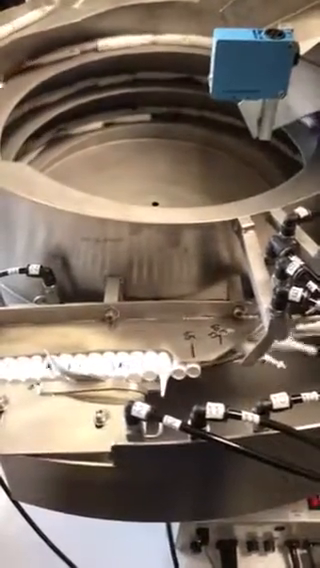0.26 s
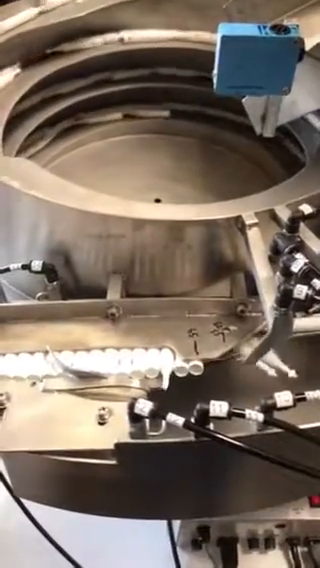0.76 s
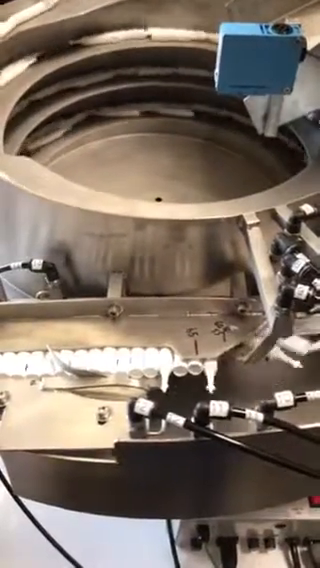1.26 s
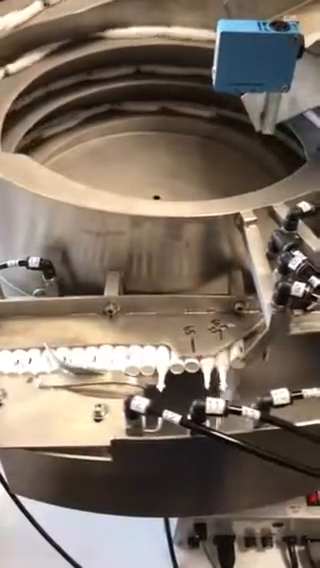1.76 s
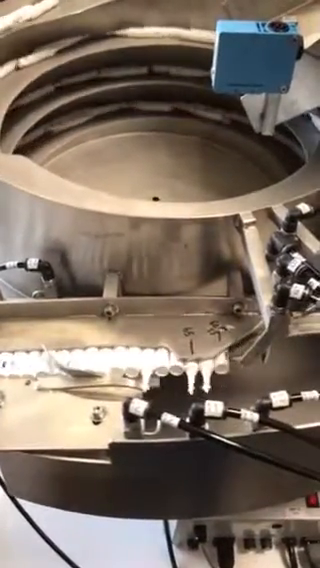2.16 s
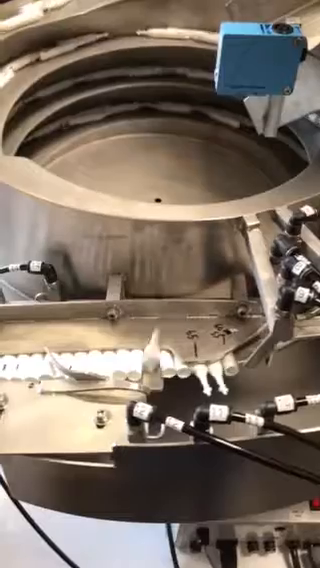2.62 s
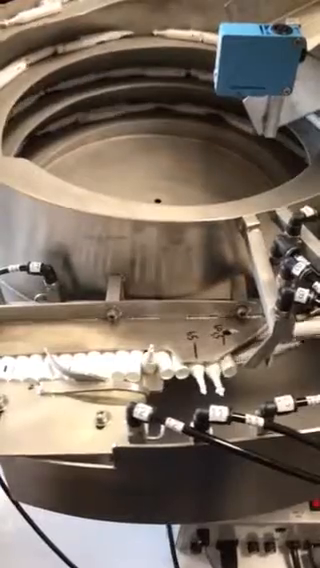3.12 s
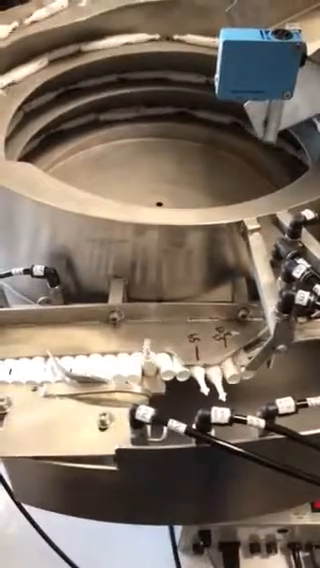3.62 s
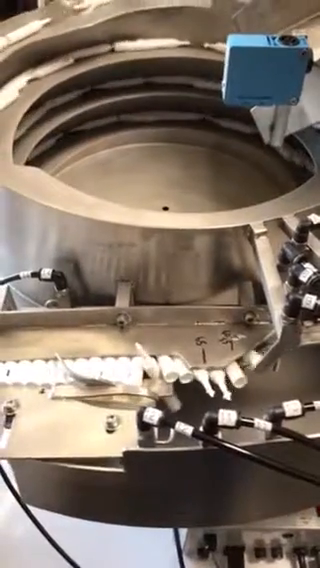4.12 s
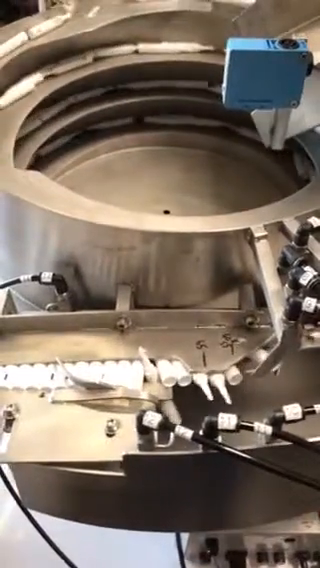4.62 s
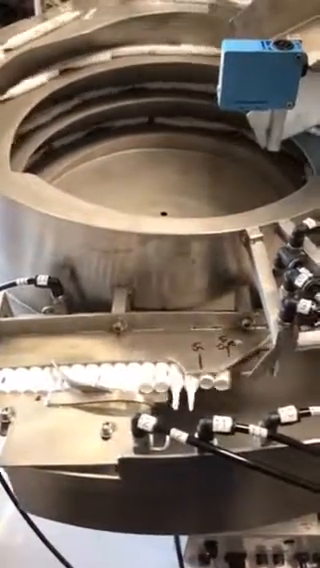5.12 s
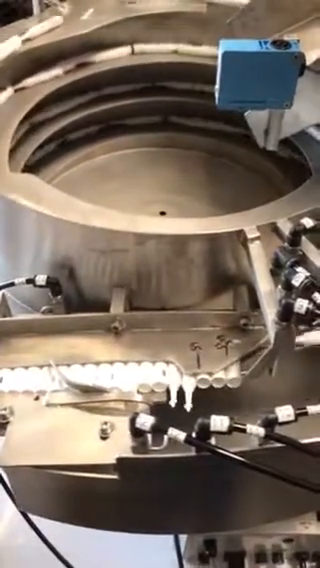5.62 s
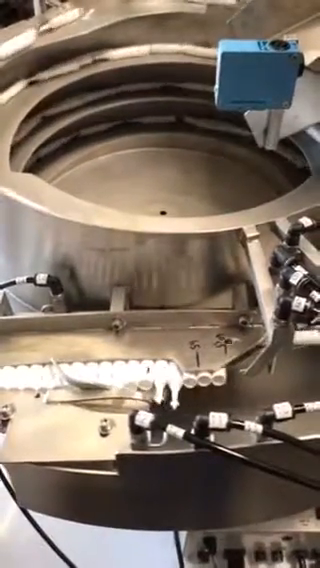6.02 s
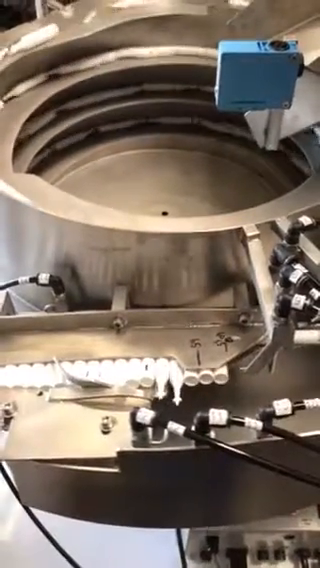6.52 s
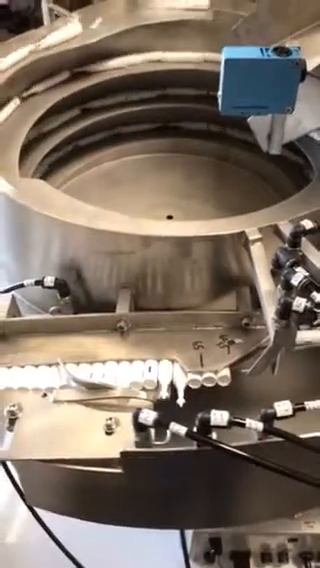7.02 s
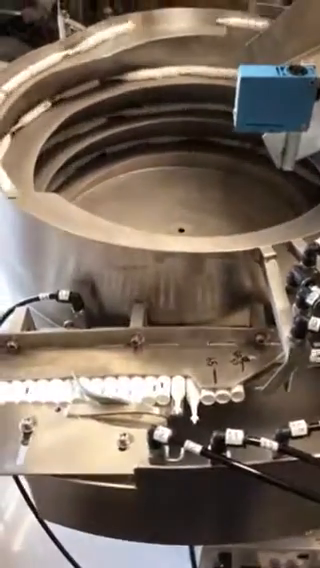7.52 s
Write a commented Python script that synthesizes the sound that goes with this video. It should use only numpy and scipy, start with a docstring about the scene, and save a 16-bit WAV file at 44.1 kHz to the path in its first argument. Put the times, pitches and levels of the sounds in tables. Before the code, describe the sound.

A vibratory bowl feeder hums deeply under a constant chatter of small tubes, with air jets hissing and spitting.

```python
"""A deep hum under bright chatter and hiss: a vibratory bowl feeder running in a workshop.
Its mains-driven magnet shakes the steel bowl, and small tubes chatter along the track on every stroke.
Air jets hiss at the sorting gate, sound the tubes' hollow resonances as they pass,
and spit when one is blown off."""
import sys
import numpy as np
from scipy import signal
from scipy.fft import rfft, irfft, next_fast_len
from scipy.io import wavfile
from scipy.ndimage import map_coordinates

SR = 44100
rng = np.random.default_rng(int(sys.argv[2]) if len(sys.argv) > 2 else 0)


def wav_out(sig):
    """Save sig, one row per channel (or a flat mono array), as 16-bit PCM at SR to the path in sys.argv[1]."""
    wavfile.write(sys.argv[1], SR, np.round(np.clip(np.atleast_2d(sig).T, -1, 1) * 32767).astype(np.int16))


N = 342657

MAINS_HZ = 60.028
# bright spectrum of the free jets, also used for the tubes' ticks: f/Hz, level/dB
BRIGHT_SPECTRUM = [(600, -17), (1700, -7), (2350, -6.5), (3100, -3.5), (4450, 2), (4880, -6), (5400, -1.5),
                   (6750, -1.5), (7650, -3.5), (8300, -3), (9100, -1), (9850, -2), (10400, -6.5),
                   (11000, -1.5), (12900, -1), (15700, -5)]
# peaky spectrum of spits and knocks: f/Hz, level/dB
SPIT_SPECTRUM = [(500, -39), (1000, -13), (1400, 7.5), (2100, -9), (3000, -1), (3800, 13.5), (4900, 2),
                 (6150, 5), (8000, 2), (9400, 7.5), (10400, -5), (12000, 4), (15500, -37)]


def magnet_hum(waver_db=1.2, waver_rad=0.11):
    """The magnet's stroke is steady; its overtones waver as the load shifts."""
    # partials of the drive: multiple of the mains, rms level/dB
    partials = [(1, -19.5), (2, -41.5), (3, -32.5), (4, -45.5), (4.5, -53), (5, -46.5), (6, -38), (7, -41),
                (9, -55), (10, -51.5), (12, -56), (14, -46), (17, -44.5), (21, -45)]
    # one swell of the low overtones: start/s, end/s, rise/dB, ramp/s
    swell = (.62, 1.88, 2.3, 0.22)
    start, end, rise_db, ramp = swell
    swell_db = rise_db * held(start, end, ramp, ramp)
    stroke_phase = 2 * np.pi * MAINS_HZ * clock()
    out = np.zeros(N)
    for order, db in partials:
        looseness = 1 if order > 3 else 0.12 * (order > 1)
        level_db = db + looseness * waver_db * wobble(5) + swell_db * (1 < order < 4)
        drift = rng.uniform(0, 2 * np.pi) + looseness * waver_rad * wobble(6.6)
        out += amp(level_db) * np.sqrt(2) * np.sin(order * stroke_phase + drift)
    return out


def landings(per_second, spread, scatter_db):
    """Tiny impacts: the tubes hop and land around the same moment of each stroke."""
    stroke = np.exp((np.cos(2 * np.pi * MAINS_HZ * clock()) - 1) / spread)
    lands = rng.random(N) < per_second / SR * stroke / stroke.mean()
    return unit(lands * rng.choice([-1, 1], N) * amp(scatter_db * rng.standard_normal(N)))


def tube_chatter(bowl_db=-32.0, track_db=-31.5, tick_db=-37.5):
    """A stream of landings drums on the bowl, rings the track and ticks brightly."""
    # body of the drumming bowl: f/Hz, level/dB
    bowl_spectrum = [(20, -7), (45, -4), (75, 0), (130, -6), (265, -10), (310, -2.5), (345, 1), (410, -5.5),
                     (530, -2.5), (730, -4.5), (900, -1.3), (1180, -1.8), (1450, -3.3), (1850, -13),
                     (4000, -30)]
    # narrow resonances of the steel track: f/Hz, width/Hz, level/dB
    track_modes = [(916, 50, 3), (1397, 50, -3.5), (3196, 240, -2.5), (3640, 280, 1), (4230, 75, -7),
                   (6130, 87, 1), (6750, 130, 0), (7170, 120, 2), (8640, 160, -2.5), (9140, 230, -3),
                   (11360, 140, -3.5), (13040, 120, 0), (15080, 200, -3.5)]
    bowl = coloured(landings(per_second=3000, spread=6, scatter_db=2.5), bowl_spectrum)
    track = resonate(landings(per_second=1500, spread=6, scatter_db=5.5), track_modes)
    ticks = coloured(landings(per_second=760, spread=1.6, scatter_db=6), BRIGHT_SPECTRUM)
    return amp(bowl_db) * bowl + amp(track_db) * track + amp(tick_db) * ticks


def tube_knocks(gain_db=-6, t60_s=0.026):
    """Now and then a tube hits the track harder: a dry knock that dies at once."""
    # hard contacts: t/s, relative level/dB
    hits = [(1.3804, -7), (1.7144, -11), (2.6884, -9), (3.1964, -7), (4.2854, -6), (7.3614, -9)]
    bursts = np.zeros(N + SR)
    t = np.arange(SR // 10) / SR
    for at, db in hits:
        decay = amp(db + gain_db - 60 * t / t60_s)
        bursts[round(at * SR):][:len(t)] += decay * rng.standard_normal(len(t)) / 3
    return filtered(bursts[:N], lambda hz: amp(along(SPIT_SPECTRUM, hz)))


def jet_hiss(level_db=-25.0):
    """The free jets blow a steady, bright hiss."""
    return amp(level_db) * coloured(rng.standard_normal(N), BRIGHT_SPECTRUM)


def jet_skim(loose_db=-44.5, row_db=-31.5, row_at_s=4.83, fade_s=0.09, packing_db_per_s=1.03):
    """Air skims the tubes' mouths: faint until a closed row slides under it, growing as the row packs."""
    # hollow resonances of the tubes hanging in the track: f/Hz, width/Hz, level/dB
    mouth_modes = [(1200, 106, -4), (3754, 64, -3.5), (4530, 170, -12), (5380, 280, -6.5), (6080, 240, -1),
                   (7320, 220, -0.8), (8000, 230, -6.5), (9400, 330, -3), (11500, 900, -12)]
    since = clock() - row_at_s
    row = amp(row_db + packing_db_per_s * since) * np.clip(since / fade_s, 0, 1)
    return (amp(loose_db) + row) * resonate(turbulence(flutter_db=1.4, rate=45), mouth_modes)


def jet_splash(standing_db=-2):
    """Air splashes off the sides of tubes that crowd the gate or stand in the jet."""
    # splash off loose tubes as they gather and clear: t/s, level/dB
    crowd = [(0, -42), (1.1, -35.5), (2.2, -39), (3.5, -31), (4.65, -36.5), (5, -33), (5.5, -34),
             (6.1, -46), (7.77, -52)]
    # colour of air breaking on a tube: f/Hz, level/dB
    splash_spectrum = [(400, -21), (900, -8), (1150, 6), (1500, 5), (1800, -1), (2400, -1.5), (3200, -1.5),
                       (3600, 5.5), (4200, -2), (5000, 0), (8000, -14), (15000, -24)]
    crowd_db = np.interp(clock(), *np.transpose(crowd))
    envelope = np.hypot(amp(crowd_db), amp(standing_db) * standing_envelope())
    return envelope * coloured(turbulence(flutter_db=2.1, rate=110), splash_spectrum)


def jet_spits(half_length_s=0.015):
    """The jet spits as a tube is blown off and flicks through it."""
    # flicks through the jet: t/s, level/dB
    flicks = [(.05, -31), (.98, -28.5), (1.53, -23.5), (1.553, -28), (1.79, -28), (3.41, -24), (3.445, -28),
              (4.095, -30), (4.3, -28), (5.175, -26), (5.45, -26), (5.523, -26.5), (6.92, -30), (7.41, -31)]
    envelope = sum(amp(db) * puff(at, half_length_s) for at, db in flicks)
    return envelope * coloured(turbulence(flutter_db=4.0, rate=250), SPIT_SPECTRUM)


def standing_envelope(lean_db_per_s=0, enter_s=0.026, leave_s=0.05):
    """The jet's strength on tubes that slide in, stand and leave; leaning further in makes it grow."""
    # tubes standing in the jet: start/s, end/s, level midway/dB
    stands = [(1.485, 1.52, -28), (1.97, 2.0, -32), (2.35, 2.9, -40), (3.373, 4.08, -29),
              (4.267, 4.43, -29.5), (5.13, 5.178, -33.5), (5.84, 5.884, -32)]
    envelope = np.zeros(N)
    for start, end, db in stands:
        lean_db = lean_db_per_s * (clock() - (start + end) / 2)
        envelope += amp(db + lean_db) * held(start, end, enter_s, leave_s)
    return envelope


def singing(hz, waver_hz):
    """A tone of rms 1 whose pitch and strength are shaken by turbulence."""
    pitch = hz + waver_hz * wobble(220)
    strength = amp(2.3 * wobble(100))
    return unit(strength * np.sin(2 * np.pi * np.cumsum(pitch) / SR))


def tube_whistle(airy_db=-5.5, stray_db=-45):
    """A tube shaking in the jet sings an airy whistle; tubes nearby keep it going faintly."""
    # air column of a tube closed at one end: f/Hz, pitch waver/Hz, relative level/dB
    air_modes = [(1274, 35, -4), (3785, 48, 0), (6100, 120, -15), (7425, 80, -13), (9310, 140, -12)]
    tone = unit(sum(amp(db) * singing(hz, waver) for hz, waver, db in air_modes))
    # the unsteady part of the flow rings the same resonances more broadly
    airy = resonate(rng.standard_normal(N), [(hz, 3 * waver, db) for hz, waver, db in air_modes])
    envelope = np.hypot(amp(stray_db), standing_envelope(lean_db_per_s=4))
    return envelope * unit(tone + amp(airy_db) * airy)


def rim_chirps(waver_ratio=0.018):
    """The jet glances off a tube's rim and a single resonance chirps."""
    # glancing catches: t/s, f/Hz, level/dB, half-length/s
    chirps = [(2.6, 1280, -32, .16), (3.4, 6180, -30, 0.02), (3.8, 1272, -37, .25),
              (4.085, 3785, -25.5, .02), (4.425, 3745, -30, .02), (5.523, 6100, -32, .013),
              (7.39, 6080, -30, .014), (7.406, 1250, -29, 0.011)]
    return sum(amp(db) * puff(at, half) * singing(hz, waver_ratio * hz) for at, hz, db, half in chirps)


def workshop_reverb(x):
    """The room answers with a short diffuse tail, longest in the lows."""
    # decay of the room: f/Hz, t60/s
    decay_times = [(200, 0.44), (2000, 0.13), (12000, 0.095)]
    hz, t, noise = signal.stft(rng.standard_normal(SR // 2), SR, nperseg=256)
    decay = amp(-60 * t / along(decay_times, hz)[:, None])
    tail = signal.istft(noise * decay, SR, nperseg=256)[1]
    return signal.fftconvolve(x, tail / np.linalg.norm(tail))[:N]


def amp(db):
    """Decibels to gain."""
    return 10 ** (np.asarray(db) / 20)


def unit(x):
    """Scaled to rms 1."""
    return x / np.sqrt(np.mean(x ** 2) + 1e-20)


def along(points, hz):
    """Reads (f/Hz, value) points on a log frequency axis."""
    f, v = np.transpose(points)
    return np.interp(np.log(hz + 1), np.log(f + 1), v)


def clock():
    """The time of every sample."""
    return np.arange(N) / SR


def puff(at, half_length):
    """A bell-shaped swell around one moment."""
    return np.exp(-((clock() - at) / half_length) ** 2 / 2)


def held(start, end, attack, release):
    """Rises to 1 after start, holds, and falls to 0 after end."""
    t = clock()
    return np.clip((t - start) / attack, 0, 1) * np.clip(1 - (t - end) / release, 0, 1)


def wobble(rate):
    """A smooth random curve, rate knots a second."""
    return map_coordinates(rng.standard_normal(int(N * rate / SR) + 4), [clock() * rate])


def turbulence(flutter_db, rate):
    """White noise whose strength flutters."""
    return unit(rng.standard_normal(N) * amp(flutter_db * wobble(rate)))


def filtered(x, response):
    """x shaped by a frequency response."""
    size = next_fast_len(N + SR // 2)
    return irfft(rfft(x, size) * response(np.fft.rfftfreq(size, 1 / SR)), size)[..., :N]


def coloured(x, spectrum):
    """x given a smooth spectrum, at rms 1."""
    return unit(filtered(x, lambda hz: amp(along(spectrum, hz))))


def resonate(x, modes):
    """x rung through a bank of resonances, at rms 1."""
    def response(f):
        return sum(amp(db) * 1j * f * width / (centre ** 2 - f ** 2 + 1j * f * width)
                   for centre, width, db in modes)
    return unit(filtered(x, response))


def scene(room_db=-14):
    """The feeder close up, in mono: the hum stays dry, tubes and air get a touch of room."""
    tubes = tube_chatter() + tube_knocks()
    air = jet_hiss() + jet_skim() + jet_splash() + jet_spits()
    near = tubes + air + tube_whistle() + rim_chirps()
    mono = magnet_hum() + near + amp(room_db) * workshop_reverb(near)
    return np.array([mono, mono])


def record(dry, top_hz=15750):
    """A brick-wall low-pass takes off the very top of the hiss."""
    return filtered(dry, lambda hz: hz < top_hz)


dry = scene()
out = record(dry)
wav_out(out)
```